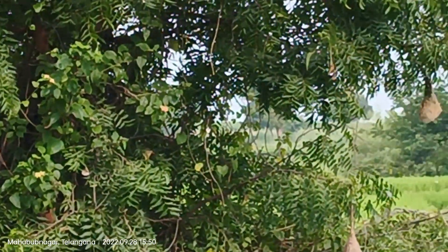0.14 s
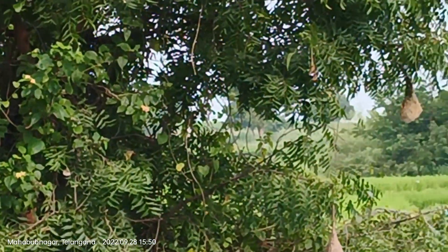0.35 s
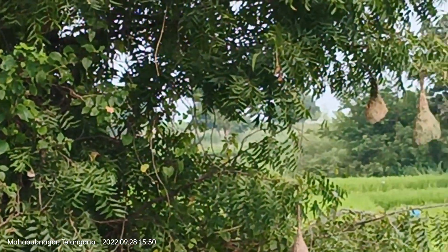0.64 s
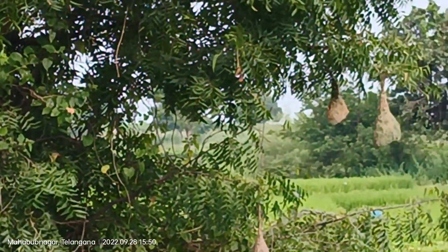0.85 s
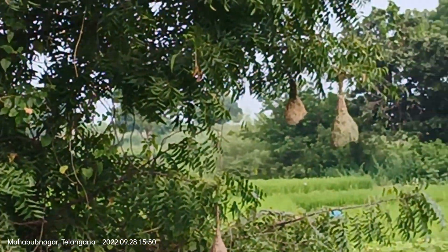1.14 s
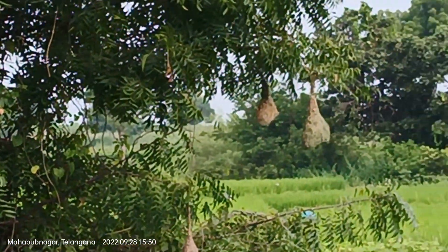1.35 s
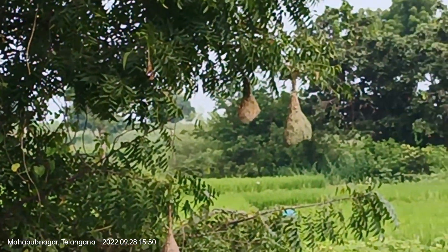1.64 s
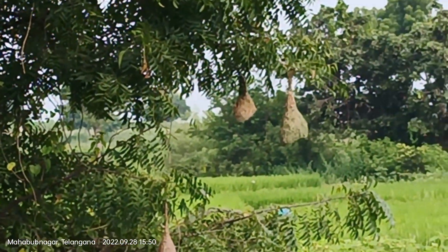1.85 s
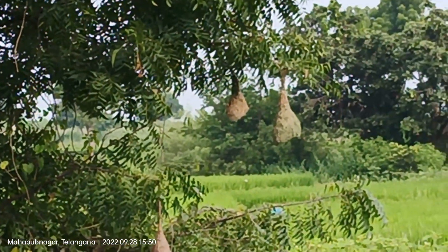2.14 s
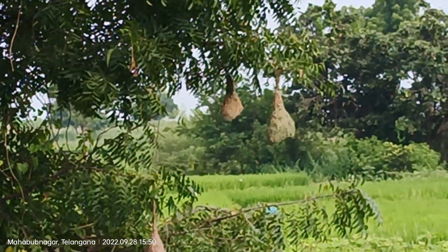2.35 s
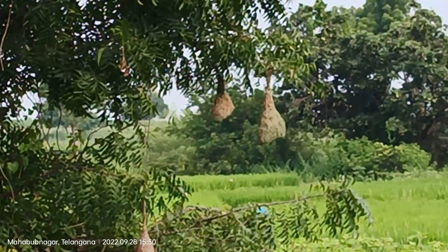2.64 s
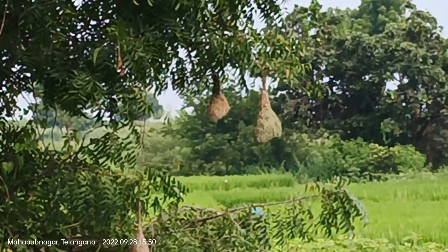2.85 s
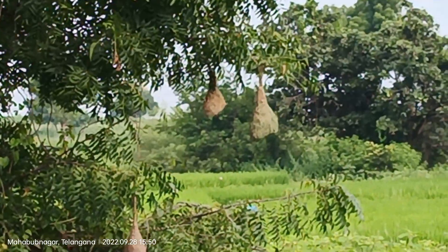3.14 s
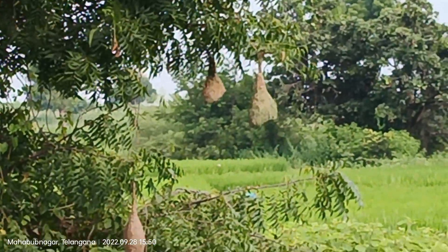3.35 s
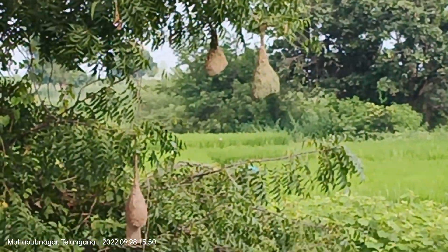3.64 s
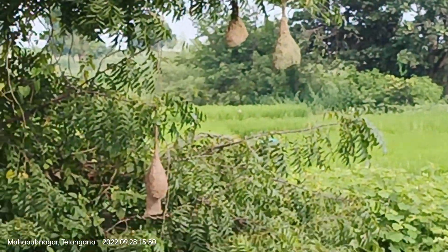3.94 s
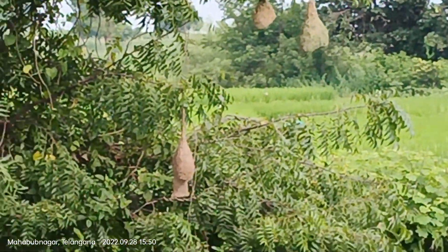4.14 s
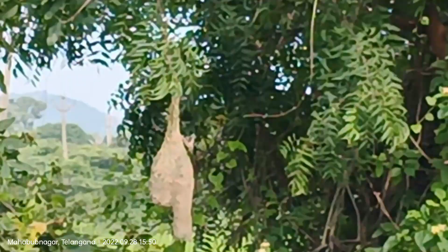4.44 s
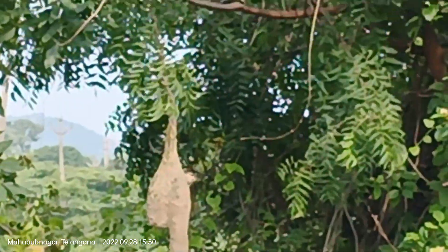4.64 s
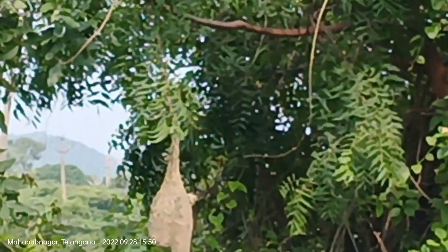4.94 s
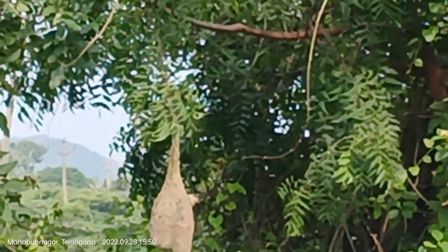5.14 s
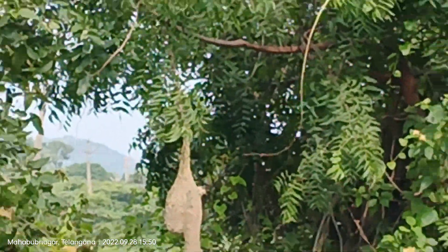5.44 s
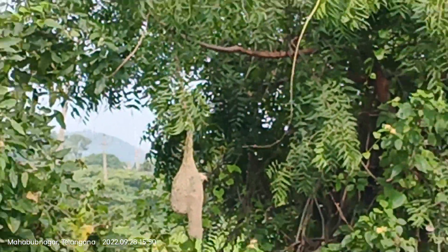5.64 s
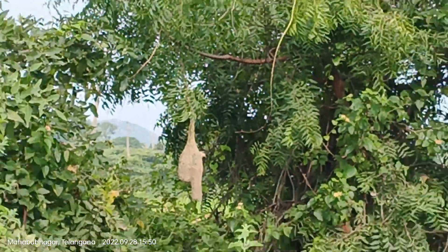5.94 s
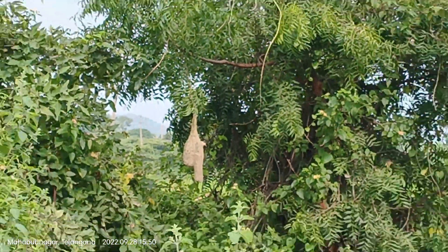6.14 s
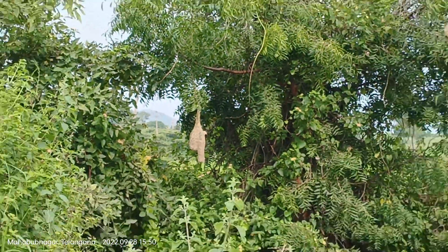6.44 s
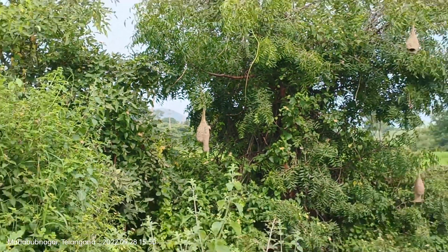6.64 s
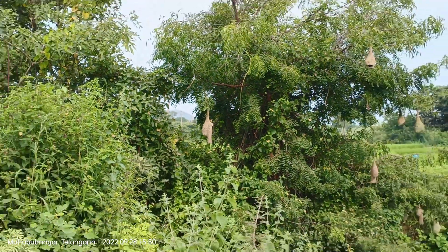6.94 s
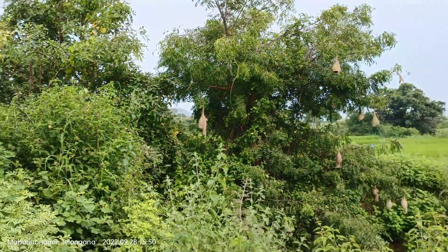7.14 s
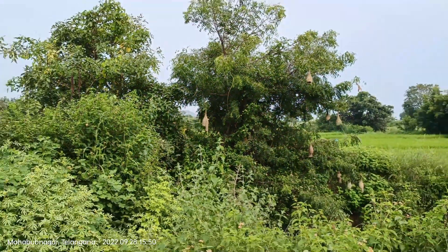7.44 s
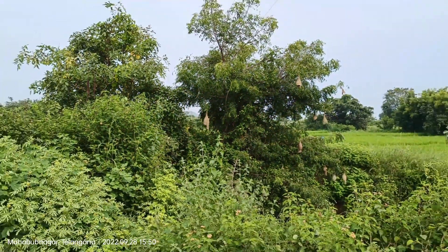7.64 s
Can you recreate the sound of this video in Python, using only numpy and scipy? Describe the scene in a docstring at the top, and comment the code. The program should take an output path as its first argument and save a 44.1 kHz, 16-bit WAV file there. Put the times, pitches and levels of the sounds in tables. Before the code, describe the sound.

Weaver birds chatter in a leafy tree with hoarse chirps and quick whistles, while the hand-held microphone is knocked and rubbed over faint outdoor rumble.

```python
"""At the edge of a field a colony of weaver birds chatters in a tree, over a low outdoor rumble.
Near chirps, thin song whistles and farther birds are frequency-modulated tones with resonant overtones,
most of them scattered by foliage; soft rasps are pulsed bands of noise and the background is coloured noise.
The hand-held phone is tapped, rubbed and knocked, mostly close to its right microphone: decaying tones
and grainy noise."""
import sys
import numpy as np
from scipy import signal
from scipy.fft import rfft, irfft
from scipy.io import wavfile
from scipy.ndimage import uniform_filter1d

SR = 44100
rng = np.random.default_rng(int(sys.argv[2]) if len(sys.argv) > 2 else 0)


def store_wav(level_fs):
    """Save 16-bit WAV to argv[1]."""
    pcm = np.round(np.clip(np.atleast_2d(level_fs), -1, 1) * 32767)
    wavfile.write(sys.argv[1], SR, pcm.T.astype(np.int16))


N = 343980
BIN_HZ = np.arange(N // 2 + 1) * SR / N


def from_db(db):
    """Logarithmic level: decibels to amplitude gain."""
    return 10 ** (np.asarray(db) / 20)


def rms_one(x):
    """Normalization to unit root-mean-square amplitude."""
    return x / np.sqrt(np.mean(x ** 2) + 1e-20)


def curve(rows, at):
    """Linear interpolation of a two-column table."""
    s, value = np.transpose(rows)
    return np.interp(at, s, value)


def at_hz(points, hz):
    """Spectral interpolation along a logarithmic frequency axis."""
    f, value = np.transpose(points)
    return np.interp(np.log(hz + 1), np.log(f), value)


def butter(x, hz, kind):
    """Butterworth filtering: a maximally flat passband from a second-order prototype."""
    sections = signal.butter(2, np.clip(hz, 10, .45 * SR), kind, fs=SR, output="sos")
    return signal.sosfilt(sections, x)


def panned(db):
    """Intensity panning: left and right gains of unit mean power; positive favours the left."""
    return rms_one(from_db([[db / 2], [-db / 2]]))


def add(out, s, sound):
    """Superposition: mix a stereo sound in at time s."""
    i = int(round(s * SR))
    a, b = max(i, 0), min(i + sound.shape[1], N)
    if b > a:
        out[:, a:b] += sound[:, a - i:b - i]


def noise(spectrum):
    """Spectral shaping: two independent white noises take on the given colour."""
    white = rng.standard_normal((2, N))
    return rms_one(irfft(rfft(white) * from_db(at_hz(spectrum, BIN_HZ)), N))


def wander(size, per_s):
    """Random modulation: normal random values, per_s of them a second, joined by straight lines."""
    return np.interp(np.arange(size) * per_s / SR, np.arange(2000), rng.standard_normal(2000))


# spectrum of the outdoor background: (frequency [Hz], relative level per hertz [dB])
FIELD_SPECTRUM = [(15, -34), (25, -23), (49, 2.5), (76, 2), (236, -14.5), (591, -15.5), (887, -19),
                  (1840, -22.5), (3250, -19.5), (3620, -36), (4140, -39), (6050, -20), (7110, -29),
                  (9840, -29.5), (16000, -38.5)]
# course of the background: (time [s], level [dB])
FIELD_LEVEL = [(0, -50), (2, -51.5), (4, -51), (6.2, -51), (7.1, -54), (7.8, -57)]
# likeness of the two ears: (frequency [Hz], left-right correlation [1])
LIKENESS = [(60, 0.97), (130, 0.66), (290, 0.71), (640, .16), (1400, 0.01), (15000, 0.027)]


def field():
    """Interaural coherence: steady outdoor noise, alike in both ears mainly in the bass."""
    alike = np.clip(at_hz(LIKENESS, BIN_HZ), -1, 1)
    mid, side = rfft(noise(FIELD_SPECTRUM))
    common = np.sqrt(1 + alike) * mid
    opposed = np.sqrt(1 - alike) * side * [[1], [-1]]
    air = rms_one(irfft(common + opposed, N))
    return from_db(curve(FIELD_LEVEL, np.arange(N) / SR)) * air


# soft pulsed rasps: hoarse bird calls, and at 4.47 s a rattle, probably of the camera's lens:
# (time [s], length [s], band bottom [Hz], band top [Hz], relative level [dB])
RASPS = [(0, .12, 2280, 3080, -45.5), (0.716, 0.1, 2280, 3180, -43.5), (1.923, 0.14, 1238, 1804, -56),
         (2.021, .1, 1870, 2500, -54), (3.091, 0.077, 1000, 1500, -56), (3.442, 0.11, 1050, 1500, -58.5),
         (3.748, .076, 980, 1480, -53), (4.47, .18, 1650, 2250, -46), (4.999, 0.37, 1900, 2460, -53)]


def rasps(pulses_per_s=72, unevenness=.25, fade_db=-9, gain_db=-1):
    """Pulsed noise excitation: brief soft rattles with uneven pulses that fade away."""
    out = np.zeros((2, N))
    for s, length, low_hz, high_hz, db in RASPS:
        t = np.arange(int(length * SR)) / SR
        cycles = np.cumsum(pulses_per_s * (1 + unevenness * wander(len(t), 60))) / SR
        pulses = np.exp(-(cycles % 1) / 0.94)   # each falls by about two thirds
        envelope = pulses * from_db(fade_db * t / length) * signal.windows.tukey(len(t), .12)
        grains = butter(rng.standard_normal((2, len(t))) * envelope, [low_hz, high_hz], "band")
        add(out, s, from_db(db + gain_db) * rms_one(grains))
    return out


# throat and beak resonances that pass the overtones: (centre [Hz], width [Hz], level [dB])
BEAK = [(8310, 1130, 0.5), (11030, 1200, -1)]


def syrinx(hz, loudness, overtone_db, jitter, flutter_db, rasp=0.42):
    """Source and filter: a nearly pure unsteady tone, its rougher overtones shaped by resonances."""
    phase = 2 * np.pi * np.cumsum(hz * (1 + jitter * wander(len(hz), 904.4))) / SR
    loudness = loudness * from_db(flutter_db * wander(len(hz), 500))
    rough = phase + rasp * wander(len(hz), 2500)
    buzz = loudness * (np.sin(2 * rough) + 0.3 * np.sin(3 * rough))
    overtones = sum(from_db(db) * signal.lfilter(*signal.iirpeak(f, f / width, SR), buzz)
                    for f, width, db in BEAK)
    fundamental = rms_one(loudness * np.sin(phase))
    return fundamental + from_db(overtone_db) * rms_one(butter(overtones, 7600, "high"))


HURRY_PER_S = 3.07   # the turns come ever faster
SWOOP_S, LEAD_SHARE = .0075, .64   # the swoop lasts this long, from a lead-in at this share of the crest pitch
CREST_FLATNESS = 2.6   # exponent: the swoop levels off as it nears the crest
GLIDE_S = .0035   # the syrinx needs this long to change course
LEAD_DB, ONSET_DB = -28, -14   # levels at the start and the end of the lead-in
ACCENT_S = .004   # time constant of the stress on the crest


def warble(lead_s, turn_s, turns, first_low, second_low, sag_per_s, hold_s, fade_db, dip_db, accent_db):
    """Frequency modulation: a lead-in, a swoop up, then quickening swings that sink and fade.

    Returns times from the crest [s], pitch as a share of the crest's, and level [dB]."""
    end_s = turns * turn_s / (1 + HURRY_PER_S * turns * turn_s)
    t = np.arange(-lead_s, end_s, 1 / SR)
    turned = t / turn_s * (1 + HURRY_PER_S * t)
    swing = np.abs(np.sin(np.pi * turned)) * (t > 0)   # 0 on a high note, 1 on a low one
    low = np.where(turned < 1, first_low, second_low)
    swings = (1 - sag_per_s * t) * (1 - swing) + low * swing
    swoop = 1 - (1 - LEAD_SHARE) * np.minimum(np.abs(t) / SWOOP_S, 1) ** CREST_FLATNESS
    share = uniform_filter1d(np.where(t < 0, swoop, swings), size=int(GLIDE_S * SR))
    db = np.interp(t, [t[0], -SWOOP_S, 0, min(hold_s, t[-1]), t[-1]], [LEAD_DB, ONSET_DB, 0, 0, fade_db])
    return t, share, db + dip_db * swing + accent_db * np.exp(-(t / ACCENT_S) ** 2)


THROAT_HZ, THROAT_DB_PER_HZ = 3400, .0075   # the voice weakens below this pitch, by this slope


def chirp(kind, crest_hz, overtone_db, variety=0.01):
    """Pitch-dependent radiation: one hoarse warble, weaker on low notes and never quite the same twice."""
    t, share, db = warble(**kind)
    hz = crest_hz * share * (1 + variety * wander(len(t), 90.2))
    loudness = from_db(db - THROAT_DB_PER_HZ * np.maximum(THROAT_HZ - hz, 0))
    loudness = loudness * signal.windows.tukey(len(t), .1)
    return syrinx(hz, loudness, overtone_db, jitter=.022, flutter_db=3.4)


LEFT_LEAD_S = .00025   # direct sound reaches the left microphone this much earlier


def foliage(call, echo_db, near_t60=0.13, far_t60=0.41, far_db=-21, leaves_per_s=1500, twig_db=-7):
    """Multiple scattering: direct sound, twig glances, sparse leaf echoes and a faint tail; energy is kept."""
    t = np.arange(SR // 3) / SR
    echoes = rng.standard_normal((2, len(t))) * (rng.random((2, len(t))) < leaves_per_s / SR)
    decay = from_db(-60 * t / near_t60) + from_db(far_db - 60 * t / far_t60)
    echoes *= decay * (1 - np.exp(-t / 0.0028))
    twigs = rng.standard_normal((2, len(t))) * np.exp(-t / 0.0031)
    scattered = rms_one(echoes) + from_db(twig_db) * rms_one(twigs)
    paths = from_db(echo_db) * scattered / np.sqrt(len(t))
    paths[0, 0] += 1
    paths[1, int(LEFT_LEAD_S * SR)] += 1
    heard = signal.fftconvolve(call[None], paths, axes=1)
    return heard * np.sqrt(np.sum(call ** 2) / np.sum(heard ** 2, axis=1, keepdims=True))


# the chirrup's contour: durations [s], turns [1], low notes as shares of the crest pitch [1],
# sag [1/s], level changes [dB]
CHIRRUP = dict(lead_s=.012, turn_s=.0215, turns=2.5, first_low=.745, second_low=.6, sag_per_s=4.6, hold_s=.024, fade_db=-13, dip_db=.5, accent_db=3.5)
# course of the far birds: (time [s], relative level [dB])
COLONY_LEVEL = [(0, -38), (.6, -57.5), (3.2, -57.5), (3.9, -47.5), (5, -48), (5.8, -41), (6.2, -56.5),
                (7.8, -58)]


def colony(count=110, echo_db=5, spread_db=3, low_hz=4200, high_hz=6600):
    """Diffuse field: farther birds chirp at random, more echo than direct sound."""
    out = np.zeros((2, N))
    for k, (when, pitch, loud, side) in enumerate(rng.random((count, 4))):
        s = (k + when) * N / SR / count
        call = foliage(chirp(CHIRRUP, low_hz + pitch * (high_hz - low_hz), -24), echo_db)
        db = curve(COLONY_LEVEL, s) + spread_db * (2 * loud - 0.5)
        add(out, s - .03, from_db(db) * panned(6 * (side - .5)) * call)
    return out


# drift of the chirps as the phone turns: (time [s], left-right difference before each kind's offset [dB])
TREE_SIDE = [(0, 1), (3.3, 2.2), (4.3, 1.2), (5.3, 3.5), (6.3, -2), (7.8, -1.2)]


def chatter(calls, kind, gain_db, leaf_db, pan_db):
    """Independent scattering paths: each near call has its own echoes among the leaves."""
    out = np.zeros((2, N))
    for s, hz, db, overtone_db, echo_db in calls:
        call = foliage(chirp(kind, hz, overtone_db), echo_db + leaf_db)
        side_db = pan_db + curve(TREE_SIDE, s)
        add(out, s - kind["lead_s"], from_db(db + gain_db) * panned(side_db) * call)
    return out


# contours of the other two kinds, laid out like the chirrup's
CHIP = dict(lead_s=.021, turn_s=.0275, turns=1.8, first_low=.695, second_low=.45, sag_per_s=4, hold_s=.023, fade_db=-21, dip_db=2.2, accent_db=5)
WARBLE = dict(lead_s=.012, turn_s=.034, turns=2.55, first_low=.635, second_low=.475, sag_per_s=1.6, hold_s=0.028, fade_db=-10, dip_db=2, accent_db=-2.5)
# near calls: (crest time [s], nominal crest pitch [Hz], relative level [dB],
# overtone level re fundamental [dB], relative leaf echo level [dB])
CHIP_CALLS = [(.043, 5864, -19, -25, 0), (.428, 5580, -21.5, -11, -4.5), (.727, 5005, -29, -32, 2),
              (.936, 5950, -18.5, -22, 1), (1.393, 5550, -23.3, -25.5, -8), (1.685, 5550, -22.5, -34, -8),
              (2.022, 5300, -25, -36, -2), (2.383, 5350, -24, -30, -8.5), (2.798, 5490, -26.5, -30, -8),
              (3.1, 5750, -19.3, -30.5, -6), (3.471, 5850, -15.8, -23.5, -6.5),
              (3.839, 5775, -17.5, -24.5, -5.5), (4.191, 5700, -15, -26, -12),
              (6.842, 5810, -29, -27.5, -8.5), (7.07, 5860, -30, -20.5, -8), (7.406, 5776, -32, -22, -5.5),
              (7.642, 5510, -33.5, -24, -11)]
CHIRRUP_CALLS = [(.363, 5110, -27, -34, -7), (1.12, 4946, -29, -26, -5), (1.492, 5000, -28.5, -49, -4),
                 (1.896, 5020, -30.5, -34, -2), (2.33, 4770, -29, -33, 2), (2.592, 4976, -25, -51, -1),
                 (2.929, 5010, -25.5, -34, -4), (3.984, 4930, -26.5, -51, -5.5),
                 (4.335, 5200, -24.5, -29, -5), (4.66, 5127, -25.5, -26, -2), (5.045, 5204, -27, -31, -4),
                 (5.708, 5170, -27.5, -21, -8), (6.125, 5100, -32.5, -33, -10),
                 (6.446, 5030, -33.5, -47, -4), (7.336, 4780, -42, -25, 5)]
WARBLE_CALLS = [(5.328, 5750, -26.5, -17, 2), (5.877, 5440, -24.5, -21.5, -5),
                (6.019, 5490, -22, -18.5, -8.5), (6.304, 5390, -24, -31, -8.5),
                (6.524, 5445, -25.5, -28.5, -10.5), (6.664, 5585, -23, -24.5, -12.5)]


def near_birds():
    """Superposition of three kinds of frequency-modulated call from the near birds."""
    near = chatter(CHIP_CALLS, CHIP, gain_db=-1.8, leaf_db=11, pan_db=.8)
    near += chatter(CHIRRUP_CALLS, CHIRRUP, gain_db=-2.4, leaf_db=7.0, pan_db=-1.3)
    near += chatter(WARBLE_CALLS, WARBLE, gain_db=-2, leaf_db=10.5, pan_db=-.4)
    return near


WHISTLE_BOW = 0.1595   # a whistle arches above the straight glide by this share of its span


def song(notes, overtone_db, echo_db, pan_db, gain_db, jitter):
    """Continuous pitch glide: thin whistles, each one smooth arc."""
    out = np.zeros((2, N))
    for s, length, start_hz, end_hz, db in notes:
        u = np.linspace(0, 1, int(length * SR))
        bow = WHISTLE_BOW * abs(end_hz - start_hz) * np.sin(np.pi * u)
        hz = start_hz + (end_hz - start_hz) * u + bow
        loudness = signal.windows.tukey(len(u), .35) * from_db(-5 * u ** 2)
        note = syrinx(hz, loudness, overtone_db, jitter, flutter_db=1.1)
        add(out, s, from_db(db + gain_db) * panned(pan_db) * foliage(note, echo_db))
    return out


# a distant bird's low, mostly rising whistles:
# (time [s], length [s], start pitch [Hz], end pitch [Hz], relative level [dB])
LOW_WHISTLES = [(.12, 0.062, 1435, 1450, -55.5), (.448, .055, 1076, 1260, -47),
                (.495, 0.057, 1256, 1387, -41), (.55, .06, 1413, 1364, -53),
                (1.44, .097, 1157, 1204, -60.5)]


def distant_bird():
    """Near-sinusoidal tones: low whistles with almost no overtones, off to the right."""
    return song(LOW_WHISTLES, overtone_db=-60, echo_db=-6.0, pan_db=-7.0, gain_db=2.5, jitter=.004)


SONG_BEAT_S = .153   # nominal; each run is spaced evenly between its first and last note


def on_the_beat(runs):
    """Periodic repetition: one syllable a beat, growing or fading as the run goes."""
    notes = []
    for first, last, length, start_hz, end_hz, db, growth_db in runs:
        count = 1 + round((last - first) / SONG_BEAT_S)
        for k, s in enumerate(np.linspace(first, last, count)):
            notes.append((s, length, start_hz, end_hz, db + growth_db * k))
    return notes


# single whistles: (time [s], length [s], start pitch [Hz], end pitch [Hz], relative level [dB])
WHISTLES = [(.201, .035, 5700, 5840, -33), (.252, .032, 3500, 4000, -49), (.276, .023, 5750, 4440, -39.5),
            (.697, .021, 3630, 3250, -35.5), (3.378, 0.034, 6000, 5050, -43),
            (3.639, 0.017, 5190, 4080, -42.5), (3.697, 0.03, 6000, 4800, -37),
            (4.469, 0.026, 6620, 4770, -18), (4.535, .054, 5900, 5200, -22.5),
            (4.767, 0.048, 5980, 5500, -34), (4.838, .084, 5880, 4820, -27), (4.995, .019, 7000, 4270, -32),
            (5.075, .02, 6800, 4680, -29), (5.128, .076, 5960, 5130, -21), (5.239, 0.019, 5240, 3980, -39),
            (5.316, 0.13, 4730, 5190, -30.5), (5.462, 0.032, 5100, 5800, -31),
            (5.545, 0.044, 6650, 5720, -34.5), (5.6, .08, 3280, 3480, -48)]
# repeated syllables, clear and buzzing: (first time [s], last time [s], length [s], start pitch [Hz],
# end pitch [Hz], relative level [dB], growth per beat [dB])
SYLLABLES = [(3.751, 4.051, 0.021, 3470, 3930, -45.5, 5.5), (3.779, 4.381, 0.014, 6180, 4420, -35.5, 1.54),
             (4.124, 4.437, 0.017, 3550, 3900, -48, 3), (5.51, 5.986, .026, 3500, 3990, -40.5, -.4)]
BUZZES = [(4.005, 4.306, 0.0396, 5950, 5300, -32, .8), (5.633, 5.935, 0.0403, 5590, 6210, -33, -1)]


def singer():
    """Phase jitter: clear song whistles have little of it, buzzing syllables ten times more."""
    clear = song(WHISTLES + on_the_beat(SYLLABLES), overtone_db=-47, echo_db=-4,
                 pan_db=-0.5, gain_db=0.3, jitter=0.005)
    buzzing = song(on_the_beat(BUZZES), overtone_db=-27, echo_db=-2, pan_db=.6, gain_db=-.6, jitter=.05)
    return clear + buzzing


# how the two ports share the near and far birds: (frequency [Hz], left-right difference [dB])
PORT_SHADE = [(2500, .3), (3900, 2.2), (5600, -.8), (6700, .4), (8200, 22), (11500, 14), (15000, 5)]


def shaded(x):
    """Diffraction by the phone's body: its two ports share each frequency unevenly; power is kept."""
    db = at_hz(PORT_SHADE, BIN_HZ)
    return irfft(rfft(x) * np.sqrt(2 / (1 + from_db([-db, db]) ** 2)), N)


# taps on the phone's case: (time [s], relative level [dB], left-right difference [dB])
TAPS = [(.947, -45, -24), (5.039, -40.5, -28), (7.529, -48, -29)]
# modes of the case: (frequency [Hz], relative level [dB], 60 dB decay time [s])
CASE_MODES = [(323, 5, 0.074), (507, 8, 0.12), (796, 12.5, 0.069), (1043, -1.5, 0.056), (2000, -9, 0.11),
              (2226, 2, 0.13)]


def case_taps():
    """Modal ringing: each tap sets off the decaying modes of the case."""
    out = np.zeros((2, N))
    t = np.arange(SR // 4) / SR
    case = sum(np.sin(2 * np.pi * hz * t) * from_db(db - 60 * t / t60) for hz, db, t60 in CASE_MODES)
    for s, db, pan_db in TAPS:
        add(out, s, from_db(db) * panned(pan_db) * case)
    return out


# dry ticks: (time [s], noise level before filtering [dB])
TICKS = [(1.09, -37), (2.885, -45), (3.741, -43), (4.472, -31), (5.252, -39), (5.268, -39)]


def ticks(tick_t60=0.008):
    """Impulsive contact: very short decaying noises without bass."""
    out = np.zeros((2, N))
    t = np.arange(SR // 4) / SR
    for s, db in TICKS:
        burst = rng.standard_normal((2, len(t))) * from_db(db - 60 * t / tick_t60)
        add(out, s, butter(burst, 1300, "high"))
    return out


# slides of a finger on the case: (firmest time [s], time to swell or fade by 20 dB [s],
# low rubbing level [dB], high hiss level [dB])
SLIDES = [(1.32, .06, -68, -50), (4.329, .065, -54, -37), (4.74, .22, -50, -56), (5.21, .24, -48, -53),
          (5.477, .028, -23, -42), (5.53, .07, -41, -58), (6.9, .5, -58, -66)]


def sliding():
    """Amplitude envelope: low rubbing and high hiss swell and fade with each slide."""
    t = np.arange(N) / SR
    strength = np.zeros((2, N))
    for s, swell_s, rub_db, hiss_db in SLIDES:
        swell = from_db(-20 * np.minimum(((t - s) / swell_s) ** 2, 10))
        strength += from_db([[rub_db], [hiss_db]]) * swell
    return strength


# spectra of the rubbing and the hiss: (frequency [Hz], relative level per hertz [dB])
RUB_SPECTRUM = [(30, -7), (70, 8), (150, -3.5), (220, -7), (400, -12.5), (800, -14.5), (1500, -21.5),
                (2300, -20), (4000, -26), (12000, -50)]
HISS_SPECTRUM = [(30, -51), (1500, -27), (4000, 3), (8000, -7), (12000, 1.5), (15500, -10.5)]


def rubbing(rub_pan_db=-20, hiss_pan_db=-5, grain_db=5, hiss_grain_db=4.5):
    """Friction noise: one uneven grip makes both the low rubbing and the high hiss grainy."""
    rub, hiss = sliding()
    grip = wander(N, 200)
    out = rub * from_db(grain_db * grip) * noise(RUB_SPECTRUM) * panned(rub_pan_db)
    out += hiss * from_db(hiss_grain_db * grip) * noise(HISS_SPECTRUM) * panned(hiss_pan_db)
    return out


# knocks on the microphone port:
# (time [s], relative level [dB], thud pitch [Hz], crack level before filtering re thud [dB])
BUMPS = [(2.464, -19.5, 133, -45), (3.44, -29, 131, -40), (4.33, -24, 65, -50), (4.545, -24.5, 65, -50),
         (4.935, -24, 65, -50), (5.4755, -3.5, 770, -5), (5.477, -2.5, 210, -7), (5.538, -5, 90, -30),
         (7.429, -12, 110, 1.5), (7.431, -15, 255, -25)]
THUD_CYCLES, PORT_PAN_DB = 5.8, -30   # a thud falls 60 dB in this many cycles; left-right difference


def thuds(crack_t60=0.012):
    """Damped oscillation: each knock is a dying low tone with a short noisy crack."""
    out = np.zeros((2, N))
    t = np.arange(SR // 4) / SR
    for s, db, hz, crack_db in BUMPS:
        thud = -np.sin(2 * np.pi * hz * t) * from_db(-60 * t * hz / THUD_CYCLES)
        crack = butter(rng.standard_normal(len(t)) * from_db(crack_db - 60 * t / crack_t60), 2000, "low")
        add(out, s, from_db(db) * panned(PORT_PAN_DB) * (thud + crack))
    return out


def scene():
    """Linear superposition of the field, the rasps, the birds and the hand on the phone."""
    background = field() + rasps()
    birds = shaded(colony() + near_birds() + singer()) + distant_bird()
    handling = case_taps() + ticks() + rubbing() + thuds()
    return background + birds + butter(handling, 50, "high")


MIC_LOW_CUT_HZ, CUTOFF_HZ = 23, 15900


def record(dry):
    """Band limiting and clipping: deepest bass is shed, peaks held at 0.92, then the top is cut."""
    held = np.clip(butter(dry, MIC_LOW_CUT_HZ, "high"), -.92, .92)
    return signal.sosfilt(signal.ellip(10, .1, 90, CUTOFF_HZ, fs=SR, output="sos"), held)


dry = scene()
out = record(dry)
store_wav(out)
```